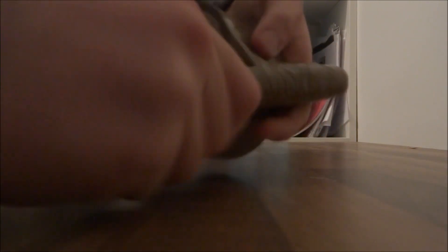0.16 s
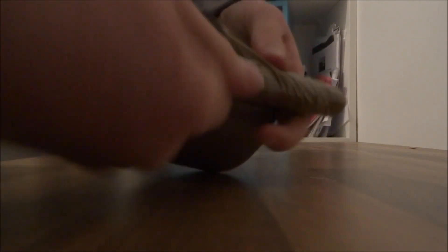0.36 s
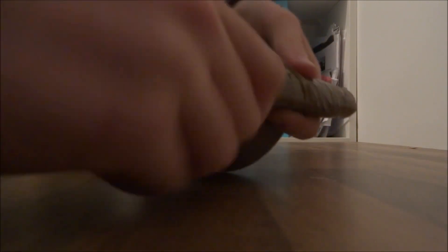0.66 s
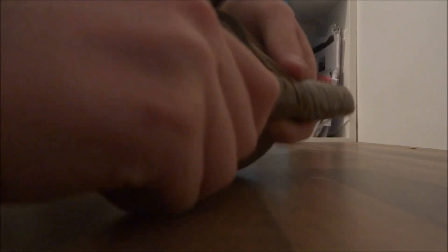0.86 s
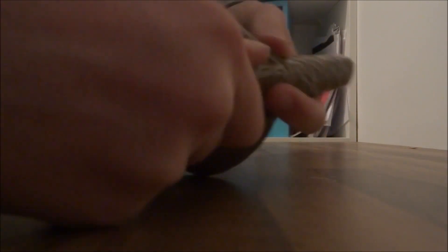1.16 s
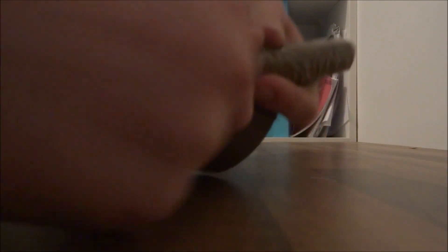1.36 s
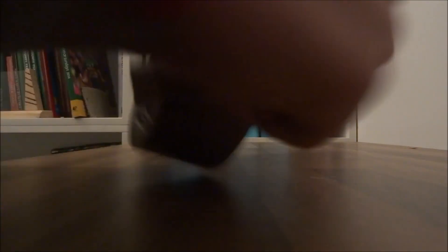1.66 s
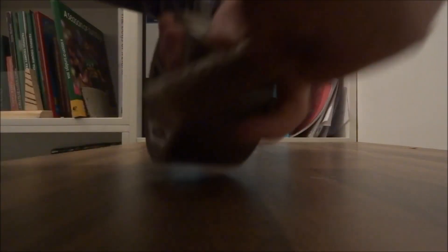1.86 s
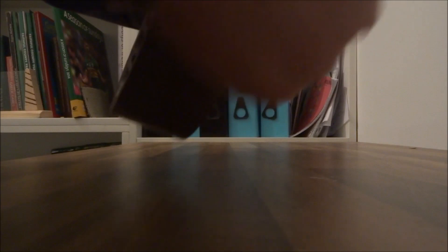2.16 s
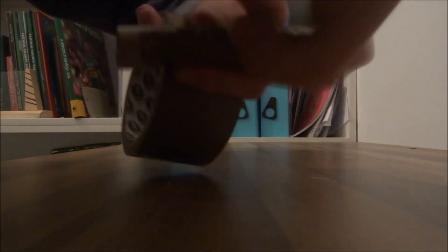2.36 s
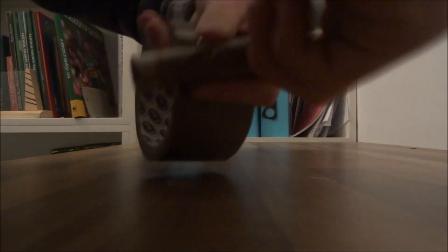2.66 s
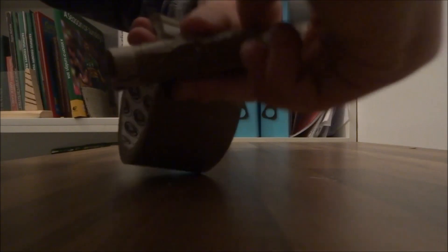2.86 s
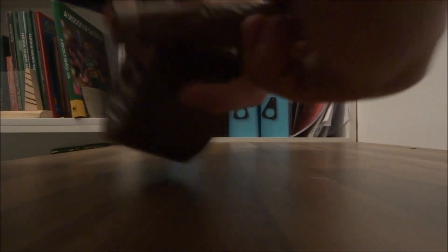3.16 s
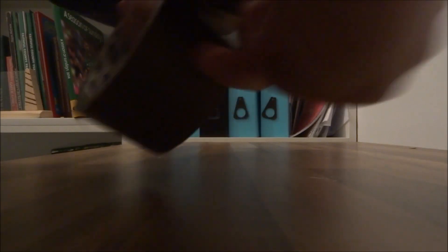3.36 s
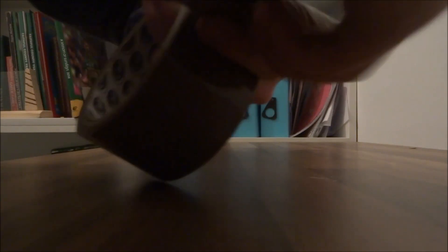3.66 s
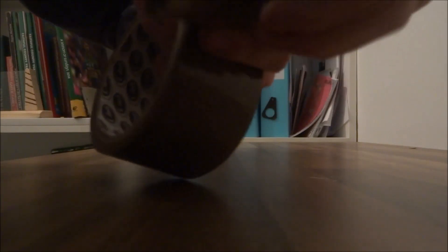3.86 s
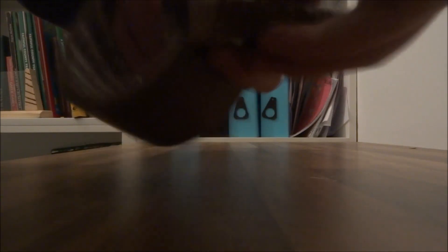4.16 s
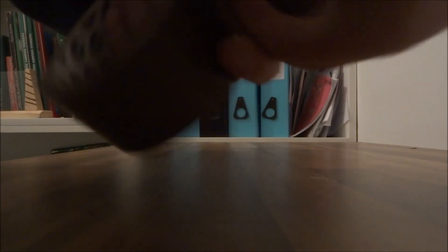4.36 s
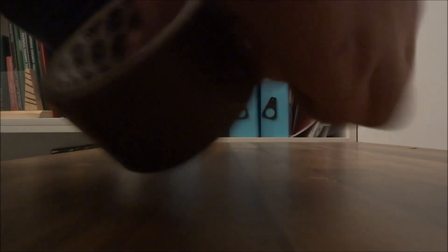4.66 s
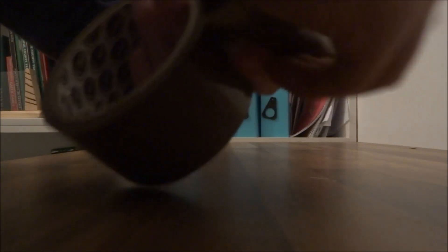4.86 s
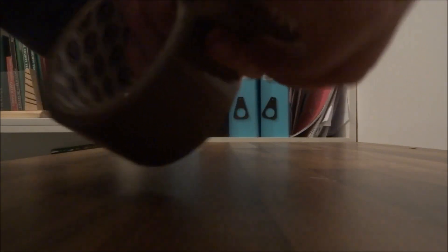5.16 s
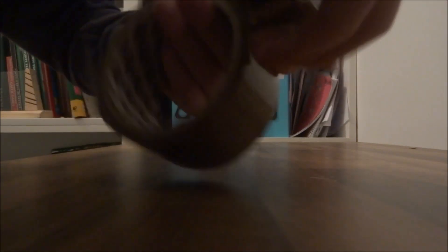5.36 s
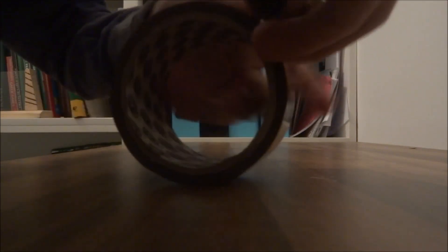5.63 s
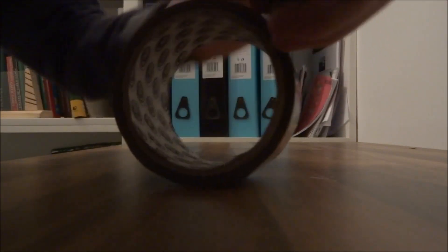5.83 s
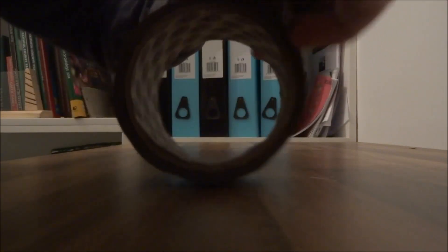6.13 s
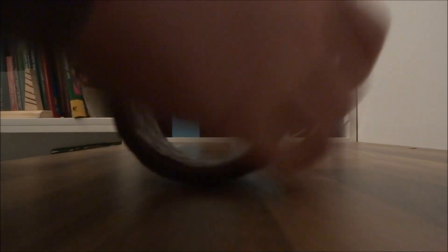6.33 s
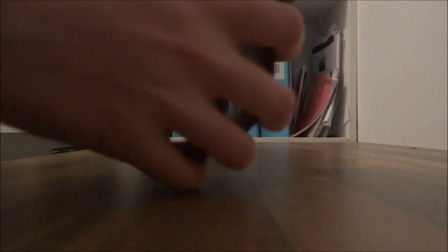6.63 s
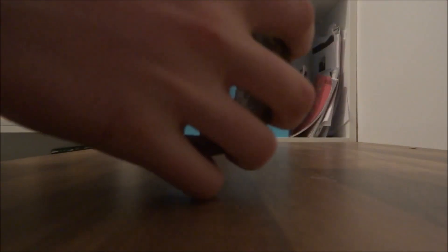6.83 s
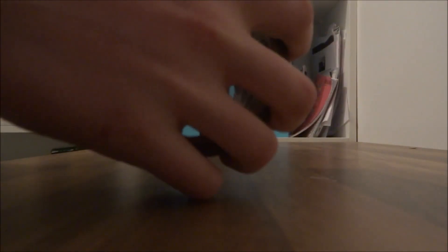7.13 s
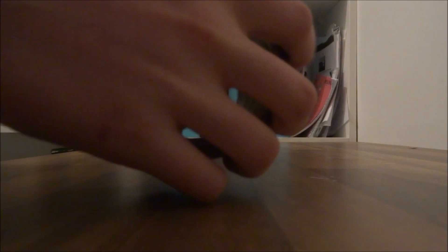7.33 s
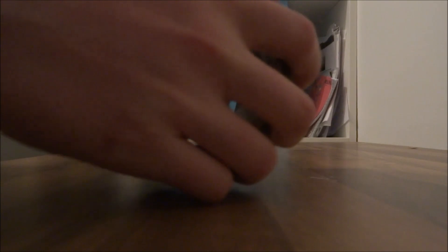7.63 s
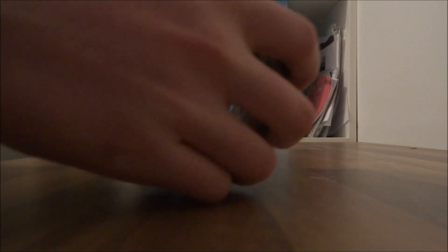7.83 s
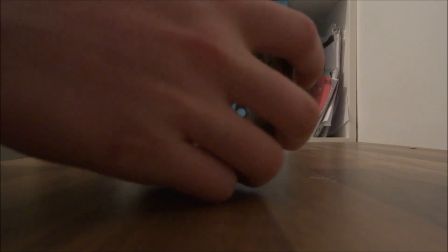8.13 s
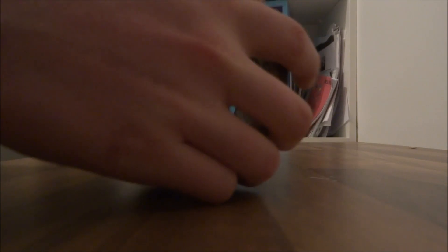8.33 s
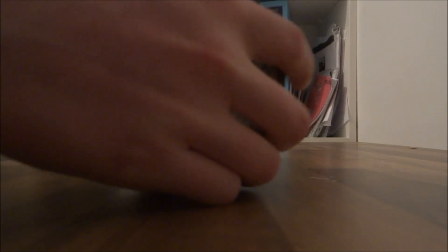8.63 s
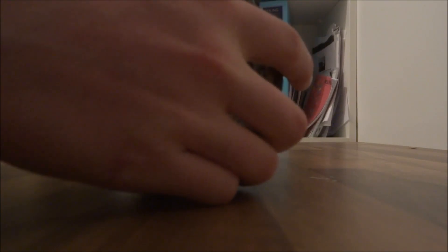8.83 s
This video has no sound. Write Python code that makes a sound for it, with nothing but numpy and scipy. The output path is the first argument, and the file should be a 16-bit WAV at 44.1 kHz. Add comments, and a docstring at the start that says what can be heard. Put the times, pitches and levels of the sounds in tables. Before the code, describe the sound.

Very close, packing tape is worked off a roll in separate loud snaps and very short crackling rips, with crinkly film between. In the middle, fingers tap the hollow cardboard core and the roll slides dully on a wooden table, with low thuds. Later the cracks turn brighter and the bumps stop. Small, quiet room with a short bright tail.

```python
"""Packing tape is pulled off its roll and wound round a cardboard tube, just above a wooden table in a small room.
The glue lets go in single cracks and in rips of many slips; each slip is a noise burst ringing film and core.
Fingers tap the core and crinkle the tape; the roll slides, and bumps ring the modes of the table.
Faint air noise lies behind. A limiter flattens each crack and lets the room swell after it."""
import sys
import numpy as np
from scipy import signal
from scipy.fft import rfft, irfft, next_fast_len
from scipy.io import wavfile
from scipy.ndimage import uniform_filter1d, minimum_filter1d

SR = 44100
rng = np.random.default_rng(int(sys.argv[2]) if len(sys.argv) > 2 else 0)


def generate_wav(signal):
    """Clip the signal to [-1, 1] and save it as 16-bit WAV at the path in sys.argv[1]."""
    frames = np.transpose(np.atleast_2d(signal))
    scaled = np.clip(frames, -1, 1) * 32767
    pcm = np.round(scaled).astype(np.int16)
    wavfile.write(sys.argv[1], SR, pcm)


N = 396459
SAMPLES_PER_MS = SR / 1000
TIME_S = np.arange(N) / SR


def undb(db):
    """Amplitude factor of a level in dB."""
    return 10 ** (np.asarray(db) / 20)


def unit(x):
    """Scale each row to an energy of one."""
    return x / np.sqrt(np.sum(np.abs(x) ** 2, axis=-1, keepdims=True))


def noise(gain):
    """Noise of standard deviation one whose spectrum follows gain(Hz)."""
    size = next_fast_len(N)
    hz = np.maximum(np.fft.rfftfreq(size, 1 / SR), 1)
    x = irfft(rfft(rng.standard_normal(size)) * gain(hz))[:N]
    return x / x.std()


def resonance(hz, centre_hz, width_hz):
    """Complex response of one damped resonance, gain one at its centre."""
    return 1 / (1 + 1j * (hz ** 2 - centre_hz ** 2) / (hz * width_hz))


def lowpass(x, order, corner_hz):
    """Butterworth low-pass."""
    return signal.sosfilt(signal.butter(order, corner_hz, fs=SR, output="sos"), x)


def decay(t, t60_s):
    """Exponential decay by 60 dB in t60_s."""
    return np.exp(-np.log(1000) * t / t60_s)


def add(track, s, sound):
    """Mix a sound into the track at time s."""
    i = int(np.clip(s * SR, 0, N - 1))
    track[..., i:i + sound.shape[-1]] += sound[..., :N - i]


# Spectrum of the room air. Each row: frequency in Hz, relative density in dB per Hz.
AIR_SPECTRUM = [(30, -26), (120, -7), (500, -4), (2000, -14.5), (15000, -77)]
AIR_DB = -67


def air(side_db=1):
    """Faint steady room background: shaped noise, independent in mid and side."""
    hz_points, db_points = np.transpose(AIR_SPECTRUM)

    def gain(hz):
        return undb(np.interp(np.log(hz), np.log(hz_points), db_points))

    mid, side = noise(gain), noise(gain)
    return undb(AIR_DB) * (mid + undb(side_db) * np.array([side, -side]))


# Modes of the table. Each row: frequency in Hz, relative level in dB, t60 in seconds.
TABLE_MODES = [(48.2, 9, 0.92), (83.3, 5.5, 0.3), (111, 12.5, 0.082), (193, -0.5, 0.28),
               (381.5, 14.5, 0.18), (532, 12.5, 0.12), (618, 1, 0.24), (970, 16, 0.048), (1060, 11, 0.052)]
# How busily the fingers work the tape, stirring table and film. Each row: time in seconds, relative level in dB.
HAND_ACTIVITY = [(0.0, -39), (0.75, -60), (0.9, -40), (1.6, -51), (2.8, -44.5), (3.75, -43.5),
                 (4.65, -38.5), (5.2, -41.5), (6.8, -37), (7.9, -42), (9.0, -39)]


def leaning(rumble_db=-21):
    """The working hands lean on the table and keep its modes faintly stirring."""
    def gain(hz):
        modes = sum(undb(db) * t60_s * resonance(hz, mode_hz, 9.0 / t60_s)
                    for mode_hz, db, t60_s in TABLE_MODES)
        return modes / (1 + hz / 900)

    activity_db = np.interp(TIME_S, *np.transpose(HAND_ACTIVITY))
    return noise(gain) * undb(activity_db + rumble_db)


# Roll and knuckles meet the table. Each row: time in seconds, relative level in dB, hardness as corner in Hz.
TABLE_BUMPS = [(0.301, -58.5, 604), (0.756, -62, 117), (1.1, -54, 150), (1.702, -45, 215),
               (2.856, -65, 129), (3.718, -56, 200), (3.955, -50, 170), (4.742, -45, 393),
               (4.884, -44.5, 343.2), (5.478, -49, 186), (5.592, -34, 1110), (5.855, -46.5, 288),
               (6.044, -47, 625), (6.285, -32.5, 90.9)]


def bumps(thud_db=22, thud_decay_s=0.036):
    """Blows ring the table top and thud briefly; a soft contact reaches only the lowest modes."""
    track, t = np.zeros(N), TIME_S[:SR]
    hz, mode_db, t60_s = np.transpose(TABLE_MODES)[:, :, None]
    ring = np.sum(undb(mode_db) * np.sin(2 * np.pi * hz * t) * decay(t, t60_s), axis=0)
    thud_band = signal.butter(2, [60, 1200], "band", fs=SR, output="sos")
    for s, db, corner_hz in TABLE_BUMPS:
        thud = signal.sosfilt(thud_band, rng.standard_normal(SR))
        blow = ring + undb(thud_db) * thud * np.exp(-t / thud_decay_s)
        add(track, s, undb(db) * lowpass(blow, 2, corner_hz))
    return track


# The roll slides in the hand and on the wood. Each row: start in seconds, length in seconds, relative level in dB.
ROLL_SLIDES = [(3.672, 0.29, -49), (4.05, 0.66, -47.5), (5.114, 0.93, -45)]


def slides(grain_db=2.47, grain_hz=40):
    """Dull, grainy friction of the roll, swelling and fading."""
    track = np.zeros(N)
    for s, length_s, db in ROLL_SLIDES:
        add(track, s, undb(db) * np.sqrt(np.hanning(int(length_s * SR))))
    grip = undb(grain_db * noise(lambda hz: 1 / (1 + (hz / grain_hz) ** 2)))
    return track * grip * noise(lambda hz: resonance(hz, 520.5, 480) * resonance(hz, 560, 5113))


GRAIN_SAMPLES = 512


def causal(power):
    """The promptest (minimum-phase) response that has this power spectrum."""
    cepstrum = irfft(np.log(power + 1e-12))
    cepstrum[:, 0] /= 2
    return np.exp(rfft(cepstrum[:, :GRAIN_SAMPLES], 2 * GRAIN_SAMPLES))


# The film's ring follows its free length and tension. Each row: time in seconds, frequency in Hz.
FILM_RING = [(.11, 3440), (.3, 4340), (2.11, 3790), (2.37, 2850), (3.25, 3550), (3.34, 3070), (5.7, 2900),
             (6.1, 3360), (7.1, 4250), (7.7, 4860), (8.2, 4040)]
# The core's ring shifts with the grip and sounds hollower as its opening turns to the microphones.
# Each row: time in seconds, frequency in Hz, hollow knock in dB.
CORE_RING = [(0.4, 1307, -44), (2.0, 1315, -27), (3.1, 1140, -26.5), (4.3, 1065, -18), (6.5, 1262, -28)]


def slips(s, db, sizzle_db, core_db, decay_s, scatter_db):
    """Each slip is a tiny burst of snapping glue threads that rings film and core.
    0 dB is unit power for 1 ms. Returns the sound aimed at the microphones and that spread into the room."""
    t = np.arange(GRAIN_SAMPLES) / SR
    hz = np.maximum(np.fft.rfftfreq(2 * GRAIN_SAMPLES, 1 / SR), 1)
    chance = rng.standard_normal((len(s), GRAIN_SAMPLES + 5))
    force = chance[:, 5:] * (np.exp(-t / decay_s) + undb(-18.0) * np.exp(-t / 0.0043))
    patch_luck, film_luck, sizzle_luck, core_luck, pitch_luck = chance[:, :5].T[:, :, None]

    film_hz = np.interp(s, *np.transpose(FILM_RING))[:, None] * np.exp(0.13 * pitch_luck)
    film_ring = unit(abs(resonance(hz, film_hz, film_hz / 5)) ** 2)
    film_broad = unit(abs(resonance(hz, 3836, 6500)) ** 3)
    film = unit(np.hypot(film_ring, film_broad))

    core_s, *core_curves = np.transpose(CORE_RING)
    core_hz, hollow_db = (np.interp(s, core_s, curve)[:, None] for curve in core_curves)
    core_low = abs(resonance(hz, core_hz, core_hz / 3)) ** 2
    core_high = abs(resonance(hz, 1.81 * core_hz, 380)) ** 2
    core = unit(core_low + 0.51 * core_high)

    # each slip frees a patch of another size, which adds its own high ring to the broad sizzle
    patch = abs(resonance(hz, 10000 * np.exp(patch_luck / 3), 2130))
    sizzle = unit(abs(resonance(hz, 10340, 26000)) ** 3 * (1 + patch))
    # the tug on the tape also gives a faint hollow knock in the roll
    hollow = unit(abs(resonance(hz, 639, 484)) ** 2) * undb(hollow_db)

    film = film * undb(scatter_db * film_luck)
    sizzle = sizzle * undb(sizzle_db[:, None] + scatter_db * sizzle_luck)
    core = core * undb(core_db[:, None] + scatter_db * core_luck)
    colour = causal(hollow ** 2 + film ** 2 + sizzle ** 2 + core ** 2)

    # the room gathers all directions, so the ripple of the single burst partly averages out there
    burst = rfft(unit(force), 2 * GRAIN_SAMPLES)
    sounds = unit(irfft(np.stack([burst * colour, (1 + burst) * colour], axis=1)))
    track = np.zeros((2, N))
    for start, size, sound in zip(s, undb(db) * np.sqrt(SAMPLES_PER_MS), sounds):
        add(track, start, size * sound)
    return track


def crinkle(count=600, uneven_db=1.0, tick_db=4, hiss_db=-9, wander_db=3.5, wander_hz=6):
    """Sparse little ticks of creasing film over the hiss of fingers on the tape."""
    activity = np.transpose(HAND_ACTIVITY)
    s = rng.uniform(0, N / SR, count)
    big, bright = np.clip(rng.standard_normal((2, count)), -2, 2)
    db = np.interp(s, *activity) + tick_db + uneven_db * big
    ticks = slips(s, db, 4 + 4 * bright, np.full(count, -9.), decay_s=0.003, scatter_db=0.5)
    hiss = noise(lambda hz: resonance(hz, 4700, 15000) * resonance(hz, 4500, 19000))
    pressure_db = wander_db * noise(lambda hz: 1 / (1 + (hz / wander_hz) ** 2))
    return ticks + hiss * undb(np.interp(TIME_S, *activity) + hiss_db + pressure_db)


# Fingers tap the cardboard. Each row: time in seconds, energy in dB.
CORE_TAPS = [(0.825, -31.5), (2.3522, -20.5), (3.448, -18), (3.5446, -17.5), (3.9494, -26.5), (3.98, -15.5),
             (4.5542, -18), (4.571, -18), (4.6848, -17.5), (4.883, -11.5), (7.5228, -15)]


def taps(sizzle_db=2, core_db=4):
    """A finger knocks the core, which rings more than the film."""
    s, db = np.transpose(CORE_TAPS)
    return slips(s, db, np.full(len(s), sizzle_db), np.full(len(s), core_db), decay_s=0.0031, scatter_db=2.5)


# One rip for each pull on the tape. Each row: start in seconds, length in seconds, slips per second, power in dB.
TAPE_RIPS = [(0.175, 0.085, 140, -2.5), (0.293, 0.11, 104.3, -5.5), (1.764, 0.028, 2000, -23.5),
             (1.987, 0.13, 69, -4.5), (2.951, 0.069, 108, -13), (3.025, 0.043, 345, -5),
             (3.243, 0.077, 2170, -8.5), (3.327, 0.025, 240, -14), (4.18, 0.23, 142, -2.5),
             (4.758, 0.045, 149, -10.5), (4.969, 0.045, 173, -5), (6.353, 0.056, 384, -9),
             (6.852, 0.099, 1240, -6), (7.254, 0.11, 437, -39.5), (7.373, 0.029, 149.2, -11.5),
             (7.651, 0.17, 180, -5), (8.402, 0.08, 402, -31), (8.482, 0.02, 332, -0.5),
             (8.705, 0.064, 448, -8.5), (8.827, 0.017, 332, -3.5)]
# How the hands hold the roll sets the colour of the peeling.
# Each row: time in seconds, cardboard core in dB (before any easing with crack energy), sizzle of a rip in dB.
GRIP_COLOUR = [(0.099, -27, 5), (0.38, -12, 1.5), (2.0, -15.5, 7), (3.3, -12, -1), (4.3, -9, 9),
               (5.0, -12.5, 7.5), (5.7, -4.5, 24), (6.1, -20.5, 7.5), (6.9, -14, 7.5), (7.7, -26.5, 10.5)]
BREAK_DB = 3  # the slip that starts a rip, above an average one
SAG_DB = 1.5  # a rip weakens by this much as the tape goes slack


def rips(uneven_db=6, jitter=.4, patchy_db=2.5, patch_hz=70):
    """The tape breaks away with a crack, then sticks and slips unevenly: the faster, the smaller and more even."""
    rows = []
    for start, length_s, rate_hz, power_db in TAPE_RIPS:
        count = int(np.clip(length_s * rate_hz, 2, 256))
        late, big = rng.standard_normal((2, 256))[:, :count]
        along = np.abs(np.arange(count) + jitter * late) / count
        slip_db = uneven_db * big * np.cbrt(300 / rate_hz) - SAG_DB * along
        # share the energy of the whole rip among its slips
        size = unit(undb(slip_db)) * np.sqrt(length_s * SR / SAMPLES_PER_MS)
        average_db = power_db + 10 * np.log10(SR / SAMPLES_PER_MS / rate_hz)
        rows.append((start, average_db + BREAK_DB))
        rows += zip(start + length_s * along, power_db + 20 * np.log10(size))
    s, db = np.transpose(rows)
    # the glue holds in patches, so the rip catches and runs
    patches = noise(lambda hz: abs(resonance(hz, patch_hz, patch_hz)) ** 2)
    db = db + patchy_db * np.interp(s, TIME_S, patches)
    grip_s, core_db, sizzle_db = np.transpose(GRIP_COLOUR)
    return slips(s, db, np.interp(s, grip_s, sizzle_db), np.interp(s, grip_s, core_db),
                 decay_s=0.0004, scatter_db=3.0)


# Single cracks of the glue between the pulls. Each row: time in seconds, energy in dB, treble sizzle in dB.
GLUE_CRACKS = [(0.0426, -11, 2), (0.108, 7.5, 7), (0.3976, 0, -2.5), (0.4263, -4, 5), (0.8682, -1, 8),
               (0.985, 9, 3), (1.0698, 5, 7.5), (1.099, 1.5, -3.5), (1.269, -32.5, -3), (1.4167, -11, 8),
               (1.8473, -6, -3), (1.8739, 3.5, 7), (2.3689, 0, 0.5), (2.4959, -14.5, 17), (2.7173, -29, 15),
               (2.8943, -15.5, -7), (2.909, -5.5, -12), (3.2266, -9.5, -9), (3.4071, -16, 7),
               (3.5246, -13.5, -27), (3.6183, -6.5, 4), (3.655, -9, 15), (3.8045, -16, 7),
               (3.8754, -12.5, -2.5), (3.925, -8.5, 18), (4.0046, -2.5, 4), (4.0314, 1.5, -3.5),
               (4.0554, -11, 9), (4.082, 5.5, 4), (4.5048, -12, 12), (4.6505, -11.5, 1), (5.206, -14, 27),
               (5.541, 2, 4.5), (5.6237, -11.5, 0), (5.7081, -10, 1), (5.7413, -10, 2), (5.8529, -6.5, 6.5),
               (6.0477, -3, -14), (6.1378, -2, 19), (6.2187, -5.5, 4.5), (6.2718, 6.5, 2.5),
               (6.5311, -12, 7), (6.6572, -3, 8.5), (6.764, -18, 27), (7.0756, 10.5, 6.5),
               (7.456, -6, 35.5), (7.5915, 5, 15), (7.9564, -15.5, -7), (8.058, -8, 3.5),
               (8.0695, -7.5, 16), (8.1796, -3, 0), (8.245, -10, 12)]
# first and last thread: typical time from the crack, level relative to it
BEFORE_S, BEFORE_DB = 0.004, -29
AFTER_S, AFTER_DB = 0.012, -12.5
CORE_DB_PER_DB = 0.2153  # the harder a crack, the less of it is the cardboard core


def cracks():
    """A first thread of glue gives, the taut tape jumps off the roll in one go, and a last thread follows."""
    s, db, sizzle_db = np.transpose(GLUE_CRACKS)
    grip_s, grip_db, _ = np.transpose(GRIP_COLOUR)
    core_db = np.interp(s, grip_s, grip_db) - CORE_DB_PER_DB * db
    lead, lag = rng.uniform(.5, 1.8, (len(s), 2)).T
    stages = [(s - BEFORE_S * lead, db + BEFORE_DB), (s, db), (s + AFTER_S * lag, db + AFTER_DB)]
    return sum(slips(at, energy_db, sizzle_db, core_db, decay_s=0.0014, scatter_db=1.5)
               for at, energy_db in stages)


def room(direct, spread, tail_db=-11.5, wall_db=-14.0, wall_s=0.0082, t60_low_s=0.4, t60_high_s=0.33,
         wide_db=-9, wall_side_db=-19):
    """One slap from the near wall and a short bright tail; the two close microphones hear nearly the same."""
    t = TIME_S[:SR // 2]
    white = rng.standard_normal((2, len(t)))
    low = lowpass(white, 1, 4500)
    tails = low * decay(t, t60_low_s) + (white - low) * decay(t, t60_high_s)
    tails = undb(tail_db) * unit(tails * (1 - np.exp(-t / 0.00098)))
    mid, side = signal.fftconvolve(spread[None], tails, axes=1)[:, :N]
    add(mid, 0, direct)
    add(mid, wall_s, undb(wall_db) * direct)
    side = undb(wide_db) * lowpass(side, 1, 9000)
    # the slap arrives from one side
    add(side, wall_s, -undb(wall_side_db) * direct)
    return np.array([mid + side, mid - side])


def scene():
    """Tape and hands in the room, table under the microphones."""
    direct, spread = cracks() + taps() + crinkle() + slides() + rips()
    # the bumps arrive through the table itself, alike in both channels
    return room(direct, spread) + bumps() + leaning() + air()


def record(dry, ceiling_db=-3, release_s=0.008, ahead_s=0.001, makeup_db=2.5, low_cut_hz=30, top_hz=15900):
    """A limiter ducks just ahead of each peak and recovers quickly; the rest is rounded, bottom and top are cut."""
    ahead = max(int(ahead_s * SR), 1)
    peak = np.abs(dry).max(axis=0) + 1e-9
    allowed = minimum_filter1d(np.minimum(1, undb(ceiling_db) / peak), 2 * ahead)
    # the deepest recent cut dies away exponentially
    elapsed = TIME_S / release_s
    cut = np.exp(np.maximum.accumulate(np.log(1 - allowed + 1e-12) + elapsed) - elapsed)
    limited = dry * uniform_filter1d(1 - cut, 2 * ahead) * undb(makeup_db)
    rounded = 1.36 * np.tanh(limited / 1.55)
    rounded = signal.sosfilt(signal.butter(3, low_cut_hz, "high", fs=SR, output="sos"), rounded)
    return signal.sosfilt(signal.ellip(8, .2, 70, top_hz, fs=SR, output="sos"), rounded)


dry = scene()
out = record(dry)
generate_wav(out)
```